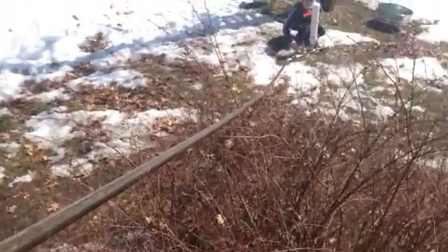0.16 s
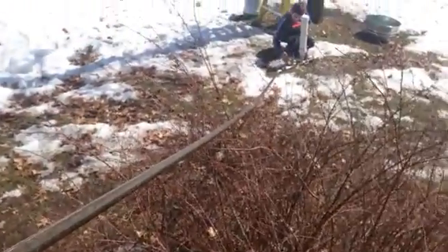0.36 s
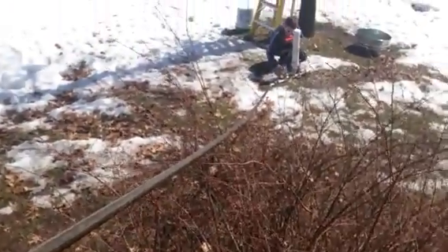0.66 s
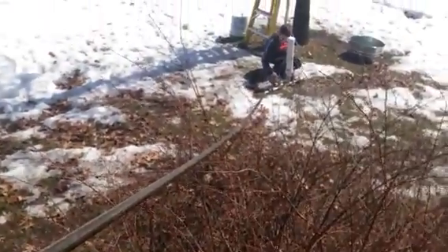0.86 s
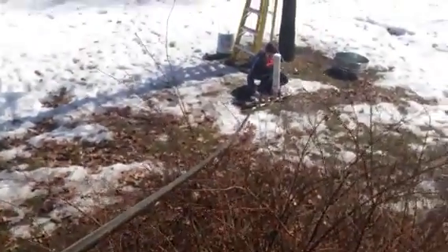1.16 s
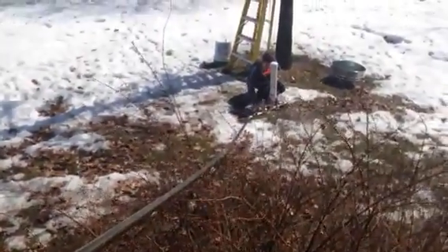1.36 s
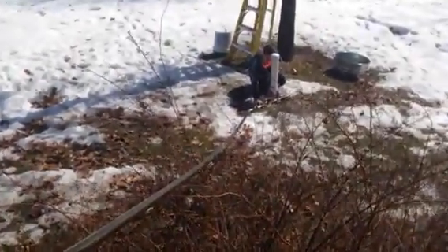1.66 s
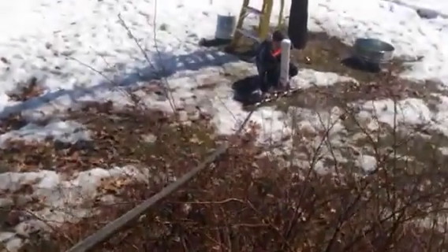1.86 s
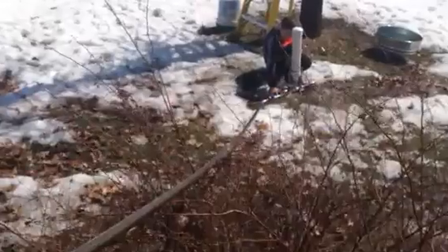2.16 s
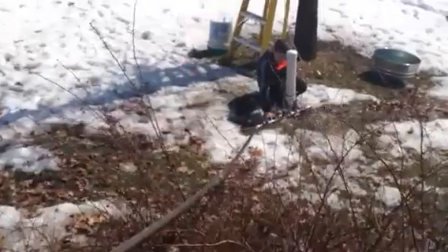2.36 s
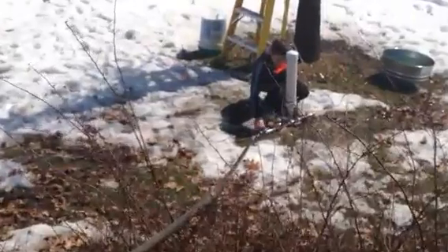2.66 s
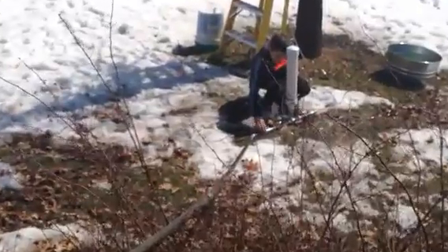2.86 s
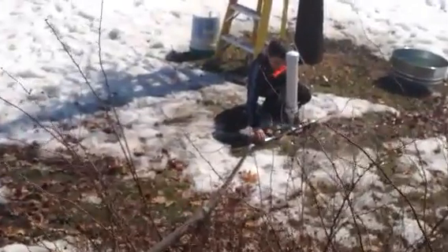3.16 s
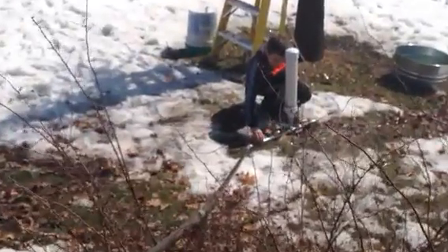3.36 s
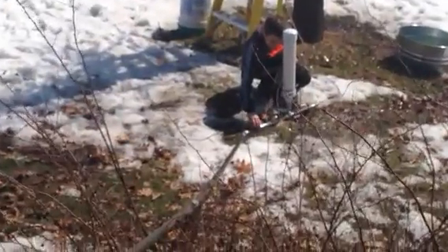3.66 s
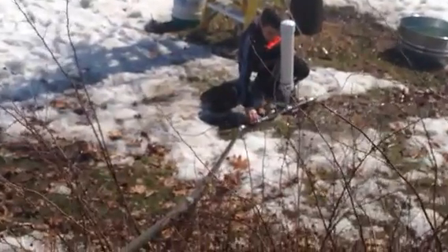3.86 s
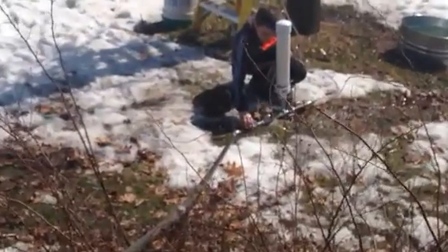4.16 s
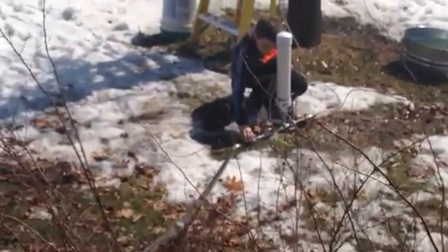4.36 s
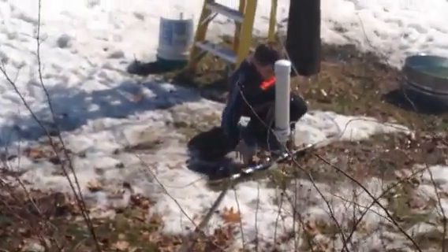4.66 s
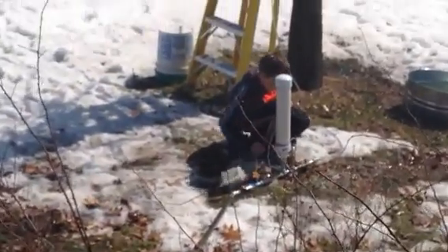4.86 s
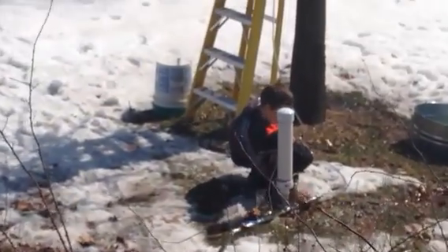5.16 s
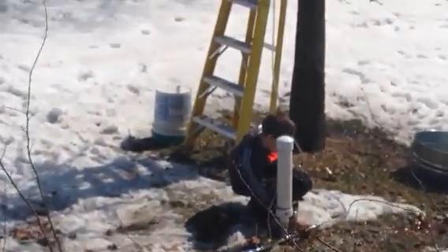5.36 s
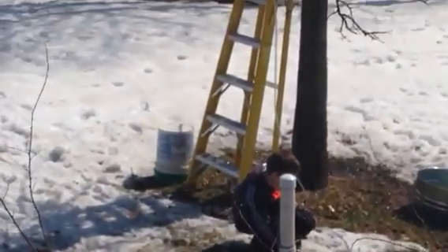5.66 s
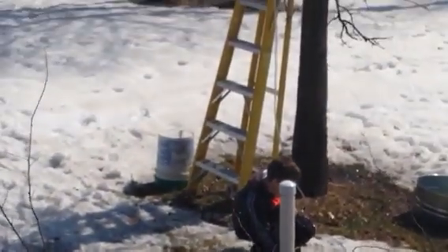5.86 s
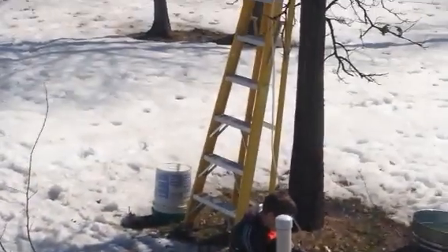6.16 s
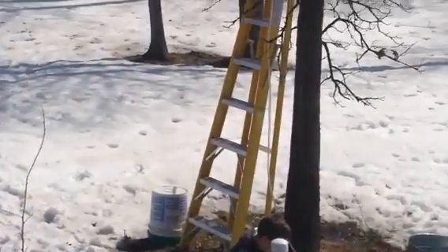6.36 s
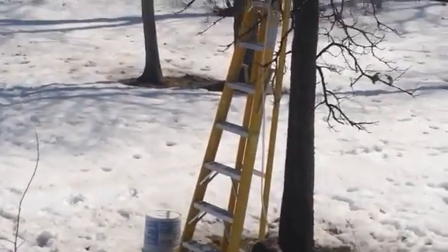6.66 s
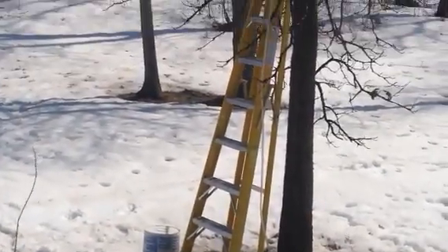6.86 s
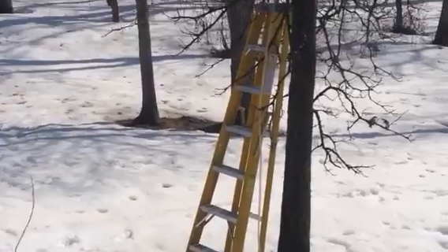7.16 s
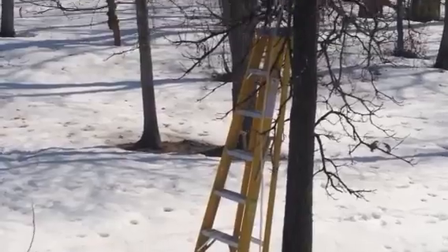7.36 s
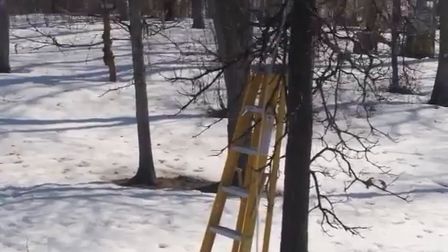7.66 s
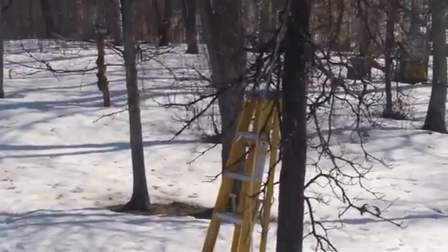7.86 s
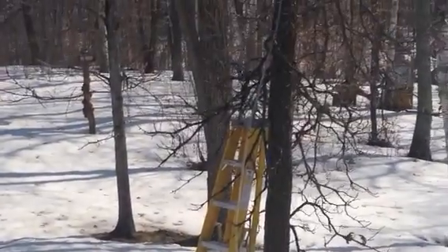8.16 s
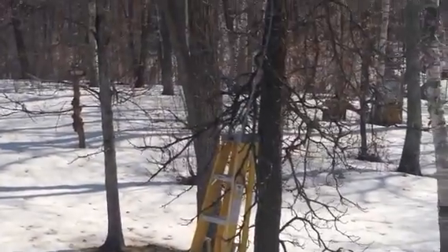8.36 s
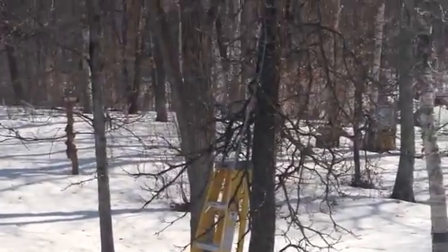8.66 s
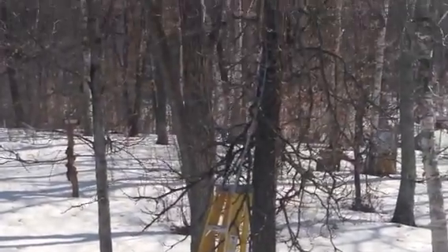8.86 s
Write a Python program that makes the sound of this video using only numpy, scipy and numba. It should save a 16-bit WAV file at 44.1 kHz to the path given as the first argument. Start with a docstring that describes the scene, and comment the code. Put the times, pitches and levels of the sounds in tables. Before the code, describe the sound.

Steady metallic clacks with a dull pipe thump, pulsing water spatter and bubbling plips between them, over faint low wind and hiss.

```python
"""In a snowy yard, some metres away, a homemade hydraulic ram pump works.
About every 0.73 s its waste valve slams shut, ringing the fittings and thumping the drive pipe.
Half a second later it drops open with a tick. Water squirts out at each slam, dwindles, and streams again
at about the tick; it is made of filtered noise, droplets, splats and bubbles.
Underneath, noise through a narrow moving filter makes a soft, hollow wind, with low buffeting and hiss."""
import sys
import numpy as np
from scipy import signal
from scipy.fft import rfft, irfft, next_fast_len
from scipy.io import wavfile
from scipy.ndimage import uniform_filter1d
from numba import njit

SR = 44100
rng = np.random.default_rng(int(sys.argv[2]) if len(sys.argv) > 2 else 0)


def digitize_waveform(pressure):
    """Quantize a signal to 16-bit integers and store it at the path in sys.argv[1].

    Rows of a 2-D input are taken as channels; values are limited to [-1, 1].
    """
    field = np.atleast_2d(pressure).T
    bounded = np.clip(field, -1, 1)
    quanta = np.round(bounded * 32767).astype(np.int16)
    wavfile.write(sys.argv[1], SR, quanta)


N = 397341

# Pump strokes. Each row: slam in seconds, relative level of the drive pipe thump in dB,
# valve drops open in seconds, relative level of that tick in dB.
STROKES = [(-0.031, 0, 0.4634, -50.5), (0.699, 0, 1.1935, -54), (1.4256, -4.5, 1.9079, -48),
           (2.163, -0.5, 2.6465, -50.2), (2.9001, 0.5, 3.3888, -46.5), (3.6317, -1.5, 4.1172, -51.5),
           (4.3704, -10, 4.873, -56), (5.104, -5.5, 5.5897, -51), (5.834, 1, 6.3337, -55),
           (6.5602, -0.5, 7.0562, -53), (7.2957, 1.5, 7.7825, -59), (8.0301, 2.5, 8.5111, -53.5),
           (8.7668, 3, 9.25, -55)]
# Rattle of one slam, from first touch to last rebound. Each row: seconds after the slam,
# relative level in dB, time to fade by 60 dB in seconds, brightness tilt in dB per octave.
RATTLE = [(-.0036, -29.5, 0.015, 1), (-.0016, -24, 0.013, 2), (0, -28, 0.012, 0), (.004, -29.5, 0.12, -1),
          (0.0136, -28, 0.023, -1), (.032, -39, 0.054, 0), (.046, -43.5, 0.041, 6.5)]
# Ringing tones of the valve body and pipework.
# Each row: pitch in Hz, relative level in dB, time to fade by 60 dB in seconds.
BODY = [(157.7, -49, 0.25), (195.6, -41, 0.27), (258.4, -43, 0.23), (301.6, -34.5, 0.17),
        (448.5, -34.5, 0.14), (497, -43.5, 0.18), (724, -33.5, 0.1), (832, -35, 0.088), (986, -37, 0.076),
        (1213, -37, 0.12), (1304, -50, 0.049), (1460, -35, 0.07), (1587, -37, 0.024), (1690, -49.5, 0.039),
        (1707, -40, 0.13), (1950, -39.5, 0.13), (2305, -32, 0.071), (2473, -38.5, 0.09),
        (3555, -37.5, 0.04), (3755, -36, 0.076), (4180, -26.5, 0.032), (4600, -37, 0.04),
        (5190, -31.5, 0.033), (9830, -38.5, 0.031), (10200, -54, 0.22), (10500, -54, 0.27)]
# Ringing tones of the free valve stem.
# Each row: pitch in Hz, relative level in dB, time to fade by 60 dB in seconds.
STEM = [(1240, -39, .1), (3720, 0.5, 0.036), (7370, 0.5, 0.035), (8000, 5, 0.016), (8300, -5, 0.034),
        (8440, -5.5, 0.14), (9700, -6.5, 0.051)]
# Larger splats of water on the ground. Each row: start in seconds, relative level in dB, pitch in Hz.
SPLATS = [(0.2648, -41.5, 1680), (0.3793, -39.5, 3660), (0.7682, -36, 1600), (0.7876, -36, 1630),
          (0.9248, -36, 3040), (1.0068, -33, 1800), (1.055, -32.5, 2800), (1.0927, -36, 1950),
          (1.501, -36, 3350), (2.4595, -39.5, 1860), (2.8282, -36, 2050), (3.274, -36.5, 3260),
          (3.4822, -37.5, 1620), (4.0875, -35, 2354), (4.895, -37.5, 1930), (5.017, -34.5, 2520),
          (5.626, -38, 1850), (6.116, -36.5, 2590), (6.3088, -32.5, 1880), (6.4232, -34.5, 2270),
          (7.9026, -42, 1707), (8.4367, -35.5, 2070)]
# Strength of the wind. Each row: time in seconds, relative level in dB.
WIND = [(0.0, -50), (0.7, -61.5), (2.35, -65.5), (2.55, -53), (3.0, -61.5), (3.15, -51.5), (3.95, -56),
        (4.35, -68), (4.45, -50), (4.9, -60.3), (5.95, -57.1), (6.05, -48.5), (6.2, -50.2), (6.45, -70.5),
        (6.75, -56), (7.35, -64.5), (8.0, -44), (8.3, -55), (8.4, -45), (9.0, -51)]
# Slow swings in how hard the water spills. Each row: time in seconds, change in dB.
SURGE = [(0, 4), (.38, 7.5), (.55, -2), (.85, 4.5), (1.45, 0.5), (3.4, 0.5), (9, -2)]

# Spectrum of the metal contacts in a slam. Each row: frequency in Hz, relative level in dB per Hz.
CRACK_SPECTRUM = [(150, -37), (400, 6), (620, -8), (800, 6), (1080, -16), (1500, 4.5), (1950, -5),
                  (2450, 2), (3000, -4), (4100, -2), (5300, -5), (6500, -8), (10000, -12.5), (15500, -30)]
# Spectrum of the spraying water. Each row: frequency in Hz, relative level in dB per Hz.
SPRAY_SPECTRUM = [(200, -11), (500, -4.5), (900, 2), (1130, -4), (1600, 1.5), (2400, -1.5), (2900, -4),
                  (4300, -6.5), (5500, -12.5), (7400, -11), (10000, -14), (15500, -22.5)]
# Spectrum of the outdoor hiss. Each row: frequency in Hz, relative level in dB per Hz.
AIR_SPECTRUM = [(20, 4), (50, 6.5), (110, 12), (200, 16), (400, 8), (650, 0), (1700, -7.5), (2800, -2.5),
                (4000, 0.5), (8000, -2.5), (15500, -4.5)]
# Spectrum of the low wind buffeting. Each row: frequency in Hz, relative level in dB per Hz.
BUFFET_SPECTRUM = [(25, -32), (60, -6.5), (105, -2), (160, -5.5), (320, -4), (480, -21.5), (900, -60),
                   (3000, -66)]
# Spectra of the pipe's shudder, the recoil's gulp, the stem's scrape and the noise around the wind's drone.
# Each row: frequency in Hz, relative level in dB per Hz.
SHUDDER_SPECTRUM = [(25, -17), (70, 3.0), (190, -4), (400, -15.5), (1500, -55)]
GULP_SPECTRUM = [(40, -10), (110, -13), (185, 6.0), (300, -8.5), (480, -18.5), (800, -18.5),
                 (1150, -25.5), (3000, -79)]
SCRAPE_SPECTRUM = [(300, -3), (800, 5), (4300, 1), (6000, 0), (7500, 8), (8500, -40), (9100, -14), (15000, -22)]
SKIRT_SPECTRUM = [(100, -24), (200, -0.5), (320, 3.5), (450, -18.5), (900, -34), (3000, -65)]

SLAM_DB, SLAM_FADE_DB_PER_S = 0.75, 0.5171  # the slams grow slowly fainter
RECOIL_S, RECOIL_DB = .366, -49  # the water column springs back this long after each slam
SHUT_DB, OPEN_DB = -13.5, -2.5  # outflow with the valve shut and open, before the slow swings
REOPEN_S, REOPEN_RISE_S = .37, .13  # the flow starts to return this long after a slam, and builds up
SQUIRT_DB, SQUIRT_T60_S = 6, .22  # water squeezed out by the slam
SPURT_DB, SPURT_S, SPURT_WIDTH_S = -8.5, .28, 0.027  # a brief spurt while the valve is shut
DRONE_START_HZ, DRONE_SAG_HZ_PER_S = 252.3, 4.05  # middle pitch, before it wavers
# low buffeting: base level, share of the gusts it follows, slow growth
BUFFET_DB, BUFFET_FOLLOW, BUFFET_RISE_DB_PER_S = -71, 0.49, 0.84
TOP_HZ = 15300  # little is heard above this


def undb(db):
    """Turn decibels into gain."""
    return 10 ** (np.asarray(db) / 20)


def unit(x):
    """Scale to an rms (average strength) of 1."""
    return x / np.sqrt(np.mean(x ** 2))


def noise(count=N):
    """Plain hiss, equally strong at all frequencies."""
    return rng.standard_normal(count)


def clock(seconds):
    """Time in seconds of each sample in a stretch."""
    return np.arange(int(seconds * SR)) / SR


def fade(t, t60):
    """Dying away smoothly, by 60 dB in t60 seconds."""
    return np.exp(-np.log(1000) * t / t60)


def add(out, s, x):
    """Mix x into out from second s on, dropping what falls outside."""
    i = int(round(s * SR))
    start, end = max(i, 0), min(i + len(x), len(out))
    if end > start:
        out[start:end] += x[start - i:end - i]


def colour(x, points):
    """Shape x by a spectrum of (Hz, dB) points, then scale to rms 1."""
    hz, db = np.transpose(points)
    size = next_fast_len(len(x))
    f = np.maximum(np.arange(size // 2 + 1) * SR / size, 1)
    gain = undb(np.interp(np.log(f), np.log(hz), db))
    return unit(irfft(rfft(x, size) * gain, size)[:len(x)])


def tilt(points, db_per_octave):
    """Brighten or dull a spectrum about 2 kHz."""
    return [(hz, db + db_per_octave * np.log2(hz / 2000)) for hz, db in points]


def wander(rate):
    """Random levels, `rate` new ones a second, smoothed twice and scaled to rms 1."""
    k = int(SR / rate)
    steps = np.repeat(noise(N // k + 1), k)
    return unit(uniform_filter1d(uniform_filter1d(steps, k), k)[:N])


@njit
def resonate(x, hz, width):
    """Band-pass filter with a moving centre: it favours one pitch, as a hollow does."""
    y, band, low = np.empty(len(x)), 0., 0.
    for i in range(len(x)):
        g, k = np.tan(np.pi * hz[i] / SR), width / hz[i]
        v = (band + g * (x[i] - low)) / (1 + g * (g + k))
        band, low, y[i] = 2 * v - band, low + 2 * g * v, k * v
    return y


def ring(modes, t, scatter_db, detune):
    """Struck metal rings in many fading tones; each blow varies their levels and pitches a little."""
    out = np.zeros(len(t))
    for k, (hz, db, t60) in enumerate(modes):
        level_chance, pitch_chance = rng.standard_normal(2)
        tone = np.sin(2 * np.pi * hz * (1 + detune * pitch_chance) * t)
        # every other tone starts the opposite way
        out += (-1) ** k * undb(db + scatter_db * level_chance) * fade(t, t60) * tone
    return out


def slams(variety=0.68, lead_s=0.003413, unevenness_db=0.94):
    """The valve rattles onto its seat much the same way each time and rings the pipework."""
    out, t, short = np.zeros(N), clock(.2), clock(.12)
    grain = rng.standard_normal((len(RATTLE), len(short)))  # the part shared by all slams
    for s, _, _, _ in STROKES:
        db = SLAM_DB - SLAM_FADE_DB_PER_S * s
        add(out, s - lead_s, undb(db) * hammer())
        add(out, s, undb(db) * ring(BODY, t, scatter_db=1.5, detune=0.00354))
        for (lag, contact_db, t60, bright), same in zip(RATTLE, grain):
            mixed = same + variety * noise(len(short))
            crack = colour(mixed, tilt(CRACK_SPECTRUM, bright))
            force_db = db + contact_db + unevenness_db * rng.standard_normal()
            add(out, s + lag, undb(force_db) * fade(short, t60) * crack)
    return out


def hammer(db=-19, drop_hz=9000, end_hz=1300, sweep_s=0.0024, peak_s=0.0046, width_s=0.0012):
    """The blow runs along the pipe as a bending wave, treble first: a very short falling chirp."""
    t = clock(.012)
    hz = end_hz + drop_hz * np.exp(-(t / sweep_s) ** 2)
    swell = np.exp(-((t - peak_s) / width_s) ** 2)
    return undb(db) * swell * np.sin(2 * np.pi * np.cumsum(hz) / SR)


def drive_pipe(hz=51, thump_db=-52, shudder_db=-57, swell_s=0.073):
    """The water hammer sets the long pipe shuddering; the motion builds up and dies away."""
    out, t = np.zeros(N), clock(.6)
    swell = (t / swell_s * np.exp(1 - t / swell_s)) ** 1.57  # strongest at swell_s
    for s, db, _, _ in STROKES:
        thump = undb(thump_db) * np.sin(2 * np.pi * hz * t)
        shudder = undb(shudder_db) * colour(noise(len(t)), SHUDDER_SPECTRUM)
        add(out, s, undb(db) * swell * (thump + shudder))
    return out


def recoils(t60=0.22, rise_s=0.0022):
    """Midway through each cycle the water springs back with a dull gulp."""
    out, t = np.zeros(N), clock(.25)
    shape = (1 - np.exp(-t / rise_s)) * fade(t, t60)
    for s, _, _, _ in STROKES:
        gulp = colour(noise(len(t)), GULP_SPECTRUM)
        add(out, s + RECOIL_S, undb(RECOIL_DB) * shape * gulp)
    return out


def openings(ring_db=3, scrape_db=-2, bounce_s=0.0068, bounce_db=-6, scrape_t60=0.14):
    """The stem falls against its stop and bounces once, ringing and scraping."""
    out, t = np.zeros(N), clock(.15)
    for _, _, s, db in STROKES:
        for lag, blow_db in (0, 0), (bounce_s, bounce_db):
            ringing = undb(ring_db) * ring(STEM, t, scatter_db=1, detune=0.0053)
            scrape = undb(scrape_db) * fade(t, scrape_t60) * colour(noise(len(t)), SCRAPE_SPECTRUM)
            add(out, s + lag, undb(db + blow_db) * (ringing + scrape))
    return out


def outflow():
    """Gain of the water: a squirt at the slam, a trickle, a brief spurt, then a stream building to full."""
    t = np.arange(N) / SR
    s = np.array(STROKES)[:, 0]
    since = t - s[np.maximum(np.searchsorted(s, t) - 1, 0)]  # seconds since the latest slam
    squirt = undb(SQUIRT_DB) * fade(since, SQUIRT_T60_S)
    spurt = undb(SPURT_DB) * np.exp(-((since - SPURT_S) / SPURT_WIDTH_S) ** 2)
    opened = np.clip((since - REOPEN_S) / REOPEN_RISE_S, 0, 1)
    stream = undb(SHUT_DB) * (1 - opened) + undb(OPEN_DB) * opened
    return (squirt + spurt + stream) * undb(np.interp(t, *np.transpose(SURGE)))


def spray(flow, wash_db=-60.5, drops_db=-57.0, count=2200, spread_db=4, smear_t60=0.018, flicker_db=3):
    """Droplets patter on wet ground over the flickering wash of the jet."""
    t, patter = clock(.02), np.zeros(N)
    sizes = undb(spread_db * np.minimum(rng.exponential(size=count), 4))
    pitches = 1200 * 8 ** rng.random(count)  # 1200 to 9600 Hz
    for when, size, hz in zip(rng.random(count), sizes, pitches):
        # each drop is a brief scatter with its own broad pitch
        plip = resonate(noise(len(t)) * fade(t, smear_t60), np.full(len(t), hz), hz / 2)
        add(patter, when * N / SR, size * unit(plip))
    drops = undb(drops_db) * colour(patter, tilt(SPRAY_SPECTRUM, 4.23))
    wash = undb(wash_db) * colour(noise(), SPRAY_SPECTRUM) * undb(flicker_db * wander(35))
    return flow * (drops + wash)


def splats(gobs, slap_db=-13.0, cavity_db=-7.0, bubble_db=-6.0, slap_t60=0.02, cavity_t60=.04,
           width_hz=480, scatter_s=0.02, count=4, weaker_db=3.5):
    """A gob of water slaps down; the cavity it opens rings and closes into a few bubbles."""
    out, t = np.zeros(N), clock(.08)
    for s, db, hz in gobs:
        slap = fade(t, slap_t60) * colour(noise(len(t)), SPRAY_SPECTRUM)
        hollow = unit(resonate(noise(len(t)), np.full(len(t), float(hz)), float(width_hz)))
        cavity = fade(t, cavity_t60) * hollow
        add(out, s - .001, undb(db + slap_db) * slap + undb(db + cavity_db) * cavity)
        for k, pitch in enumerate(rng.standard_normal(count)):
            ping = bubble(t, hz * 2 ** (.18 * pitch), cycles=34, rise=0.053)
            add(out, s + scatter_s * (k / count) ** 2, undb(db + bubble_db - weaker_db * k) * ping)
    return out


def small_gobs(flow, count=44, db=-42, spread_db=2.5, centre_hz=1800, octaves=0.21, follow=0.25):
    """Lesser gobs fall at random, oftener and, up to a limit, larger the harder the water runs."""
    spilled = np.cumsum(flow ** 2) / np.sum(flow ** 2)
    at = np.searchsorted(spilled, rng.random(count)).clip(0, N - 1)
    gobs = []  # same columns as SPLATS
    for i, (size, pitch) in zip(at, rng.standard_normal((count, 2))):
        flow_db = 20 * np.log10(min(flow[i], 1))
        level_db = db + follow * flow_db + spread_db * size
        gobs.append((i / SR, level_db, centre_hz * 2 ** (octaves * pitch)))
    return gobs


def bubbles(flow, count=420, db=-49, centre_hz=1830, octaves=0.26, spread_db=3):
    """Small bubbles ping in the puddle, louder when more water runs."""
    out, t = np.zeros(N), clock(.04)
    for when, pitch, size in zip(rng.random(count), rng.standard_normal(count), rng.exponential(size=count)):
        ping = bubble(t, centre_hz * 2 ** (octaves * pitch), cycles=28, rise=0.077)
        level = undb(db + spread_db * min(size, 3)) * flow[int(when * N)]
        add(out, when * N / SR, level * ping)
    return out


def bubble(t, hz, cycles, rise):
    """A bubble rings for some cycles and rises in pitch as it surfaces."""
    life = cycles / hz
    tone = np.sin(2 * np.pi * hz * t * (1 + rise * t / life))
    return (1 - np.exp(-hz * t)) * fade(t, life) * tone


def wind(drone_db=-1.0, skirt_db=-15.0, width_hz=42, flutter_db=1.8, waver=0.031):
    """A hollow, wavering drone slowly sinks in pitch over low buffeting that swells with the same gusts."""
    t = np.arange(N) / SR
    gust_db = np.interp(t, *np.transpose(WIND))
    hz = (DRONE_START_HZ - DRONE_SAG_HZ_PER_S * t) * (1 + waver * wander(4))
    once = resonate(noise(), hz, float(width_hz))
    drone = undb(drone_db) * unit(resonate(once, hz, float(width_hz)))  # filtered twice: a purer pitch
    skirt = undb(skirt_db) * colour(noise(), SKIRT_SPECTRUM)
    buffet_db = BUFFET_DB + BUFFET_FOLLOW * (gust_db - np.mean(gust_db)) + BUFFET_RISE_DB_PER_S * t
    buffet = undb(buffet_db) * colour(noise(), BUFFET_SPECTRUM)
    return undb(flutter_db * wander(14)) * (undb(gust_db) * (drone + skirt) + buffet)


def air(db=-64):
    """Smooth, steady outdoor hiss."""
    return undb(db) * colour(noise(), AIR_SPECTRUM)


def scene():
    """Pump, water and weather in one channel."""
    flow = outflow()
    pump = slams() + drive_pipe() + recoils() + openings()
    water = spray(flow) + splats(list(SPLATS) + small_gobs(flow)) + bubbles(flow)
    return (pump + water + wind() + air())[None]


def record(dry, notch_hz=2770, notch_width_hz=300, depth=0.56):
    """Hollow out a narrow band by taking part of it away, then cut the top steeply."""
    band = resonate(dry[0], np.full(N, float(notch_hz)), float(notch_width_hz))
    hollowed = dry - depth * band
    return signal.sosfilt(signal.ellip(10, .2, 70, TOP_HZ, fs=SR, output="sos"), hollowed)


dry = scene()
out = record(dry)
digitize_waveform(out)
```